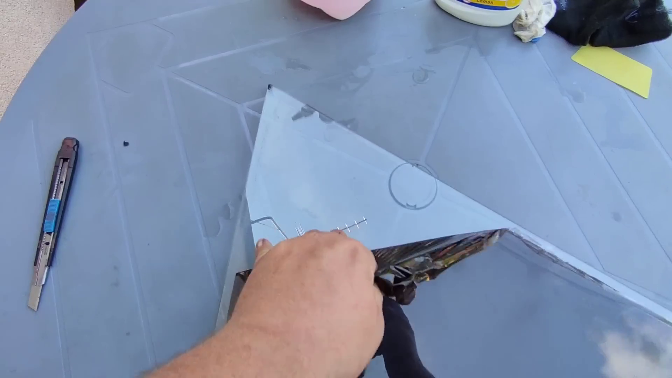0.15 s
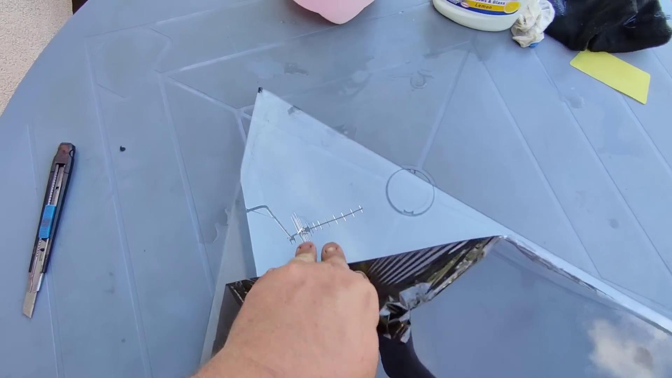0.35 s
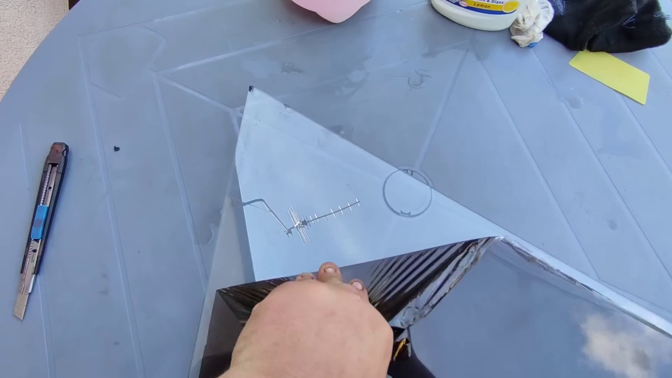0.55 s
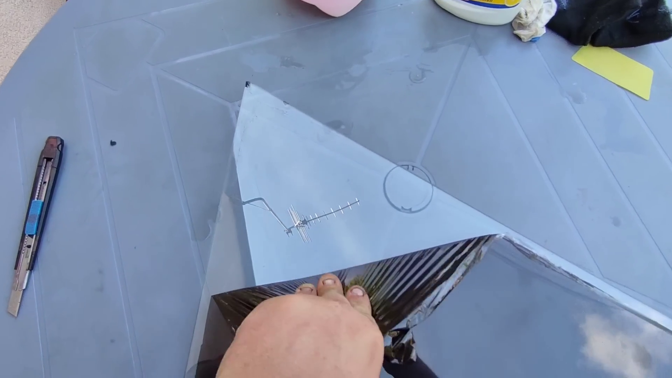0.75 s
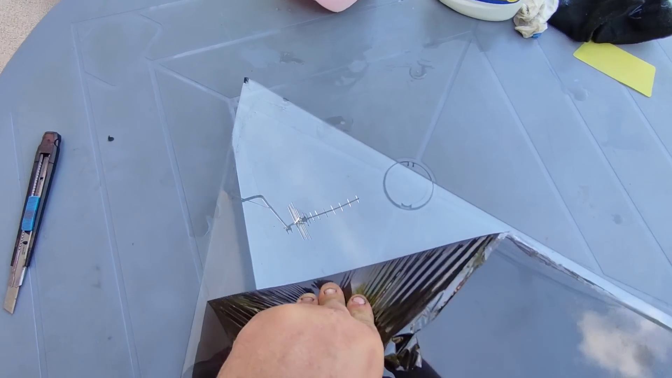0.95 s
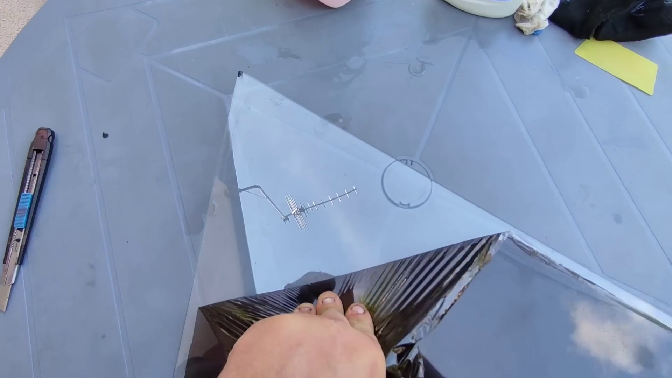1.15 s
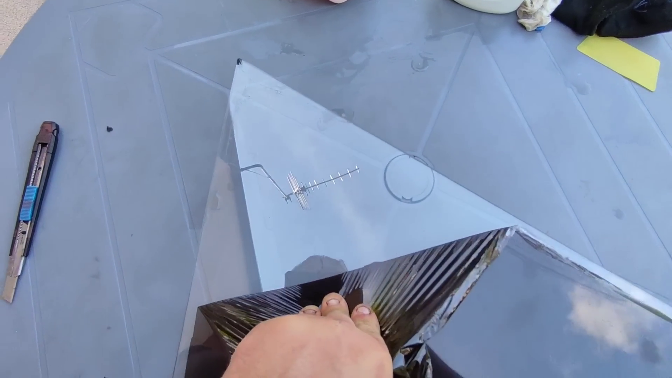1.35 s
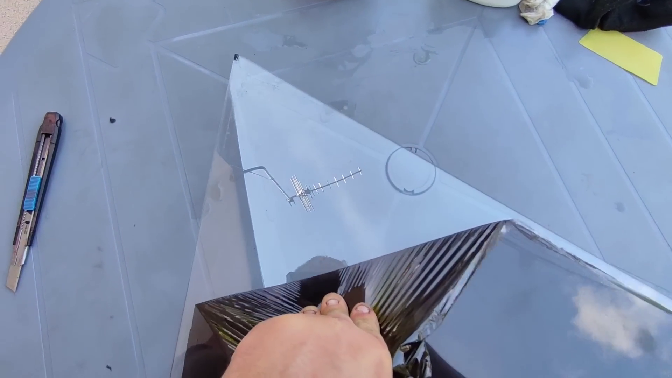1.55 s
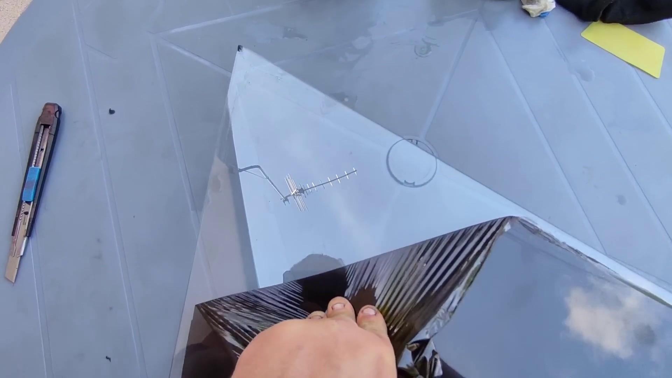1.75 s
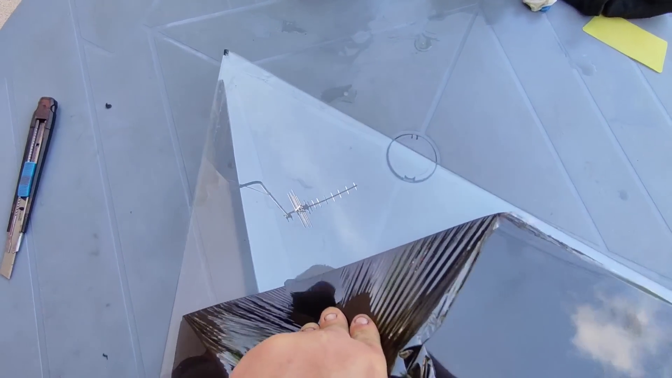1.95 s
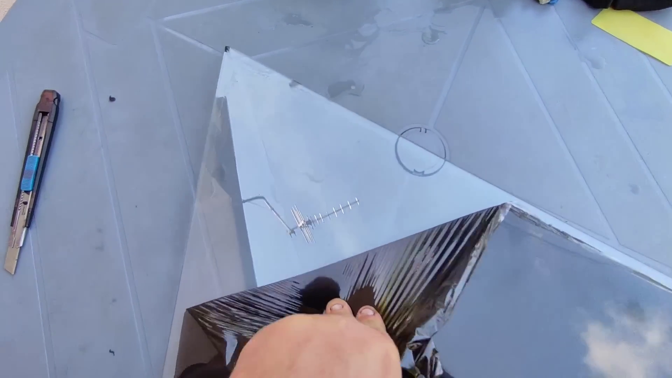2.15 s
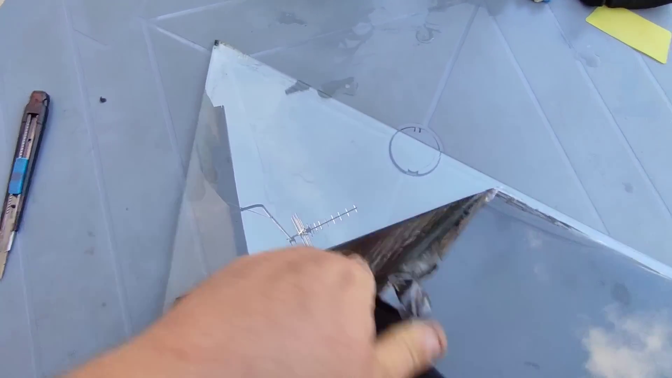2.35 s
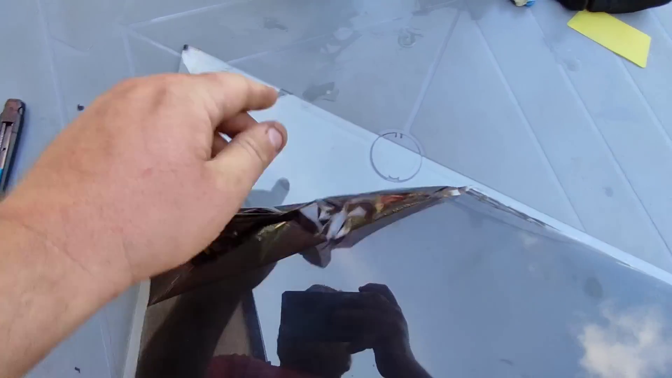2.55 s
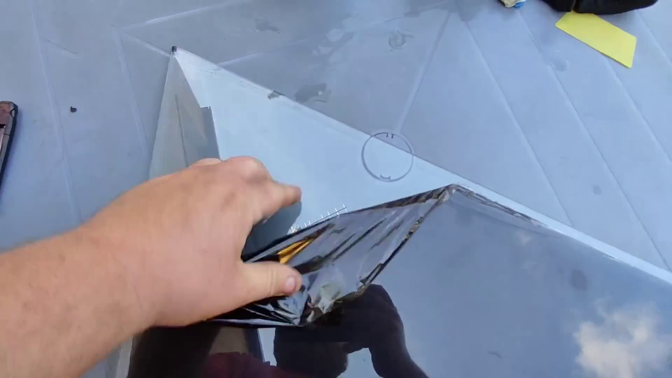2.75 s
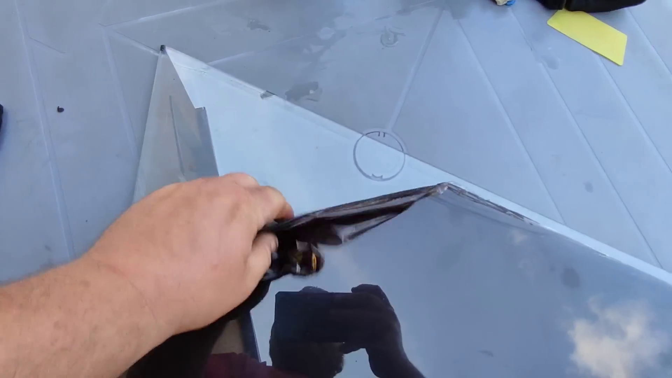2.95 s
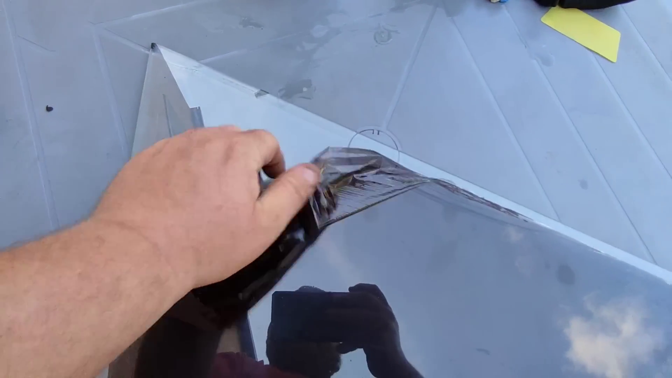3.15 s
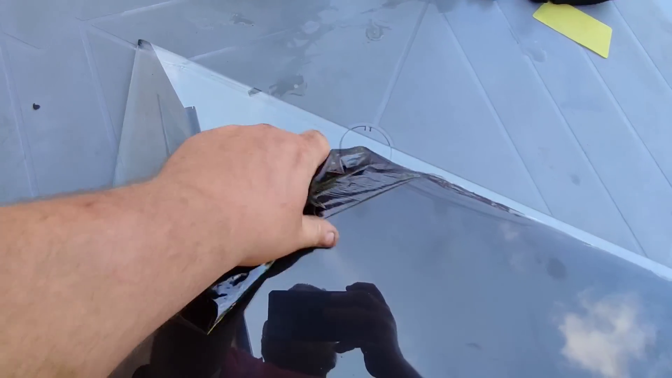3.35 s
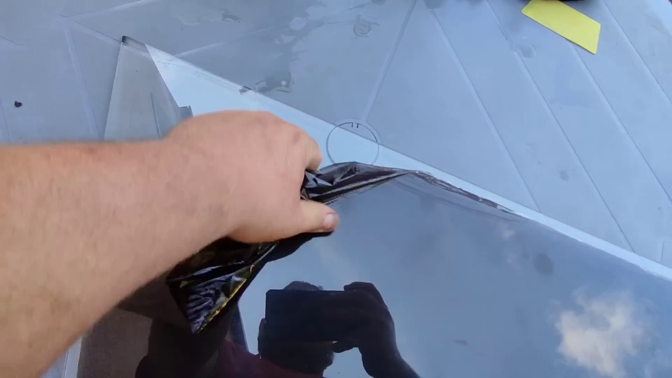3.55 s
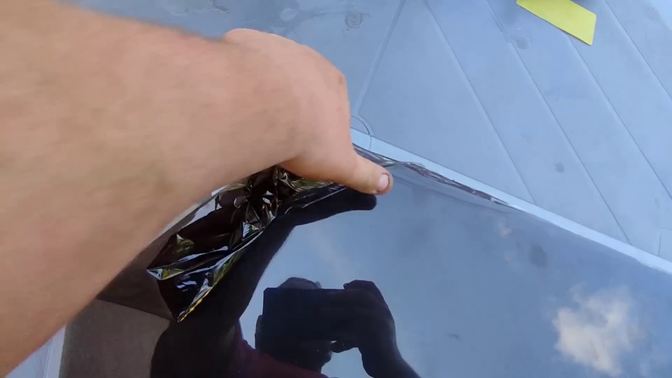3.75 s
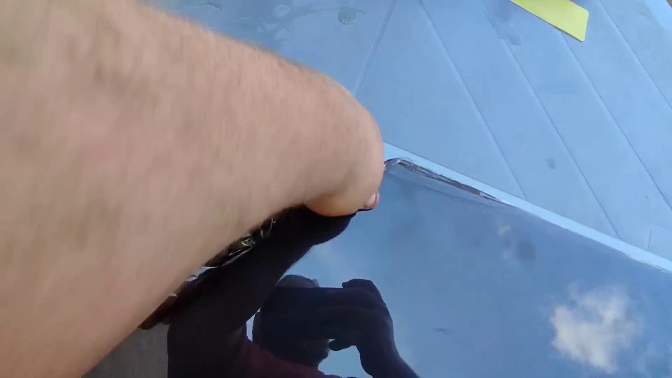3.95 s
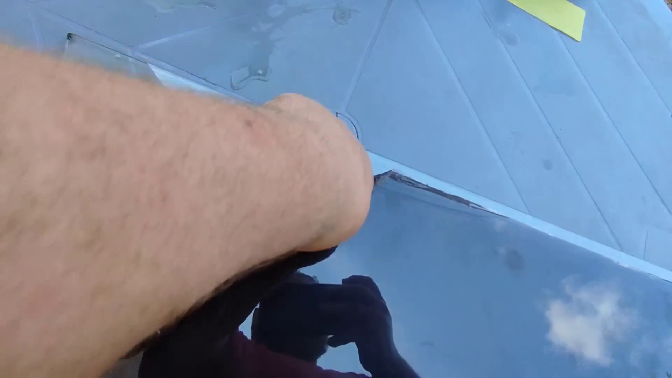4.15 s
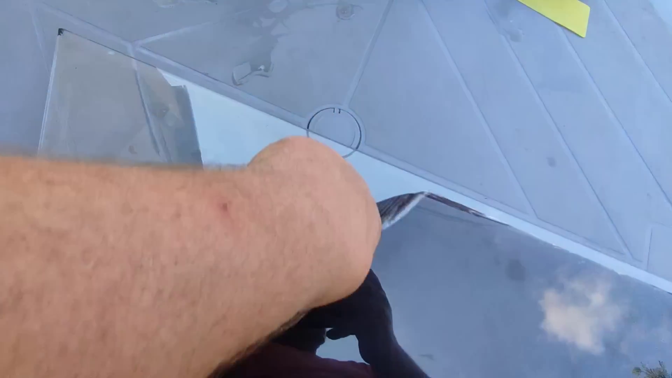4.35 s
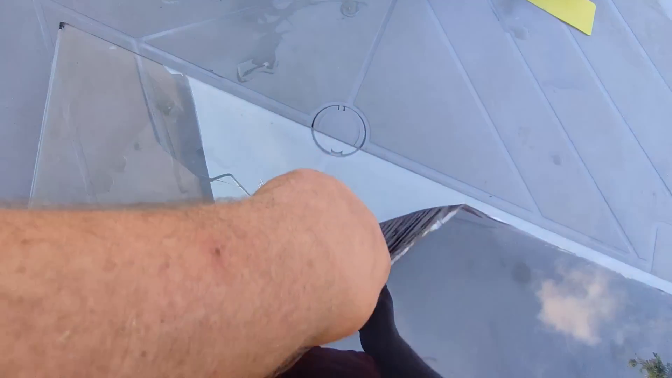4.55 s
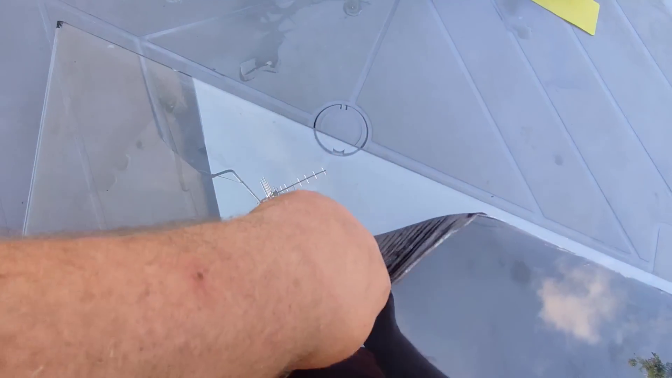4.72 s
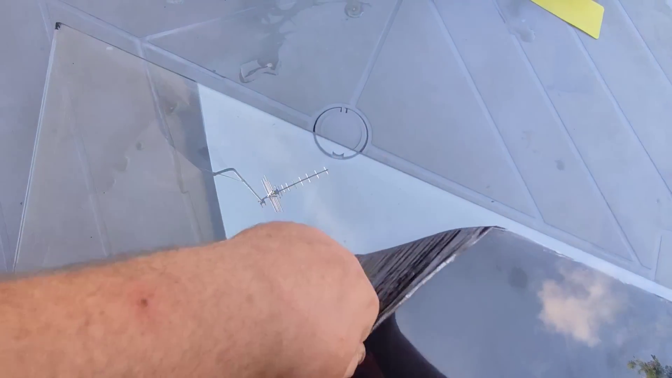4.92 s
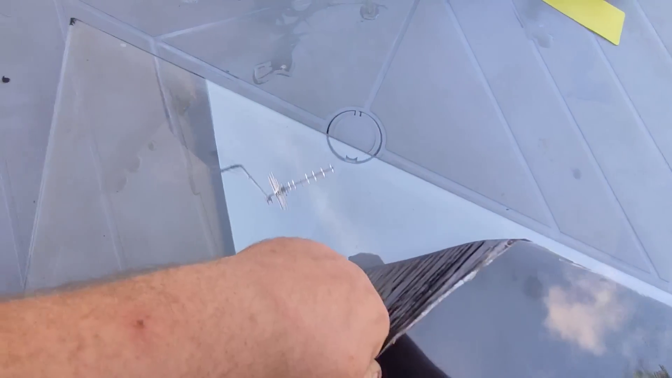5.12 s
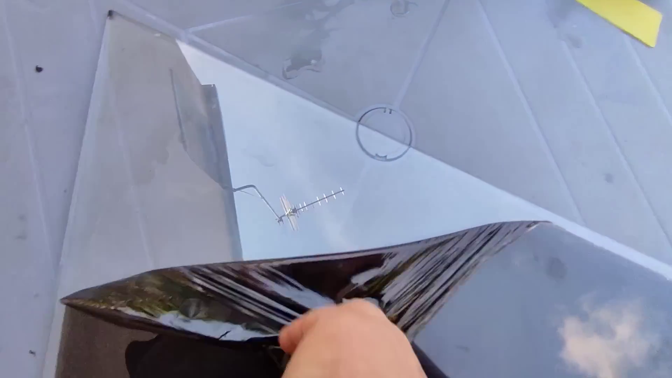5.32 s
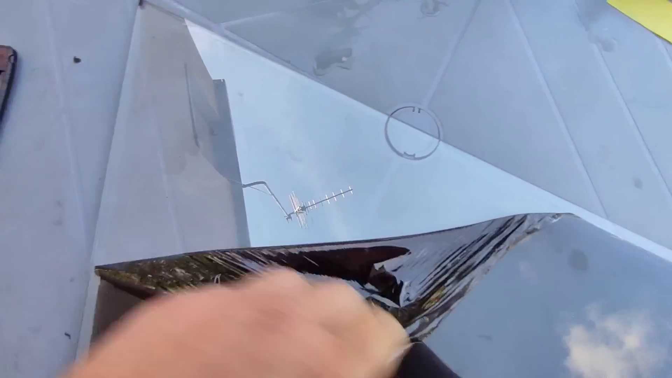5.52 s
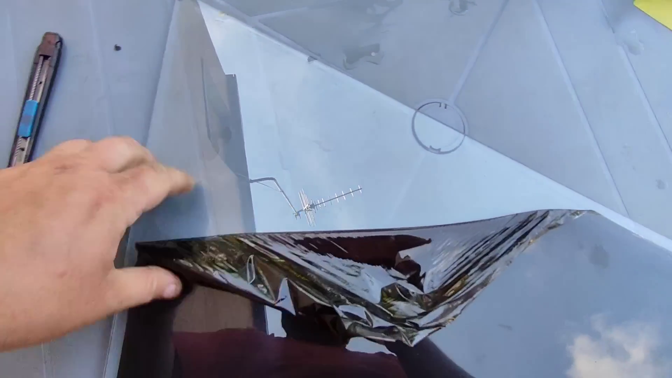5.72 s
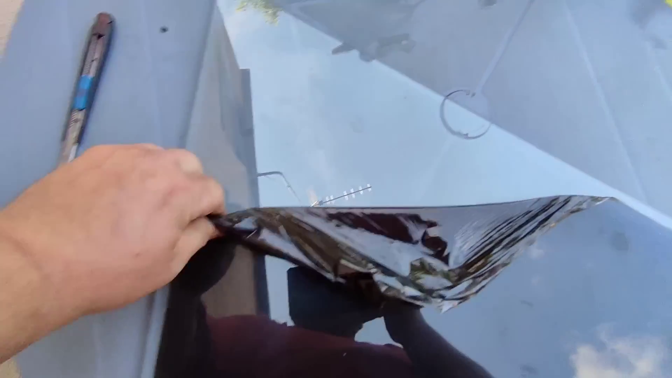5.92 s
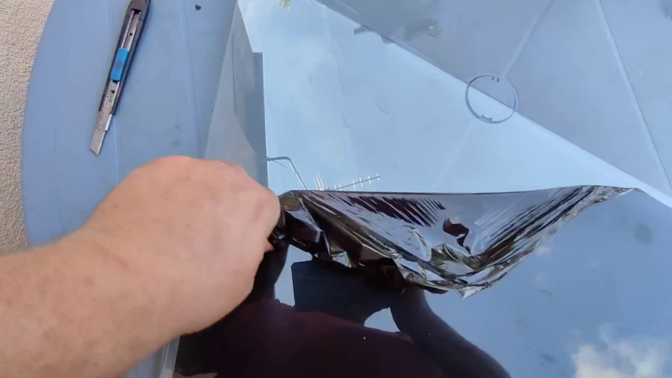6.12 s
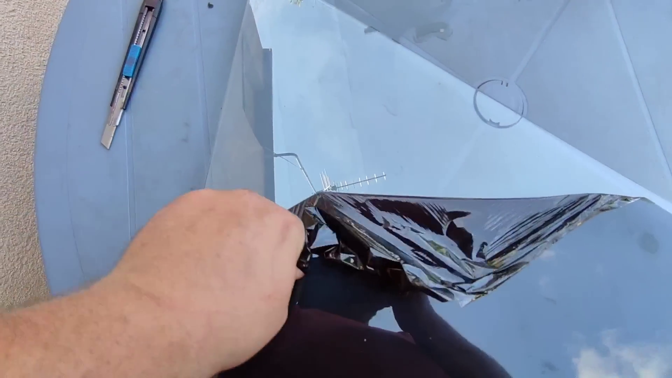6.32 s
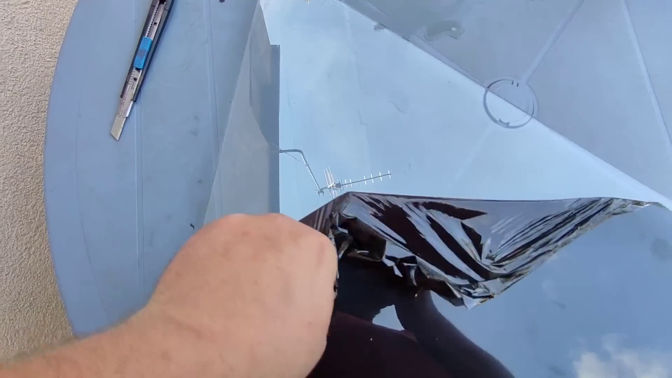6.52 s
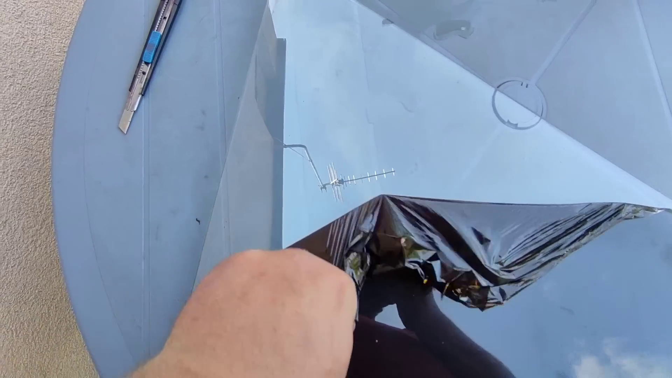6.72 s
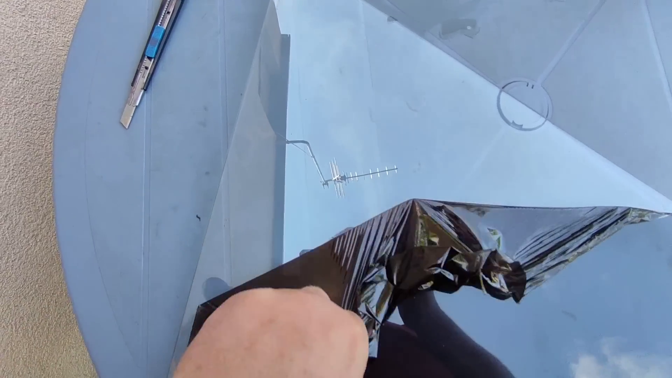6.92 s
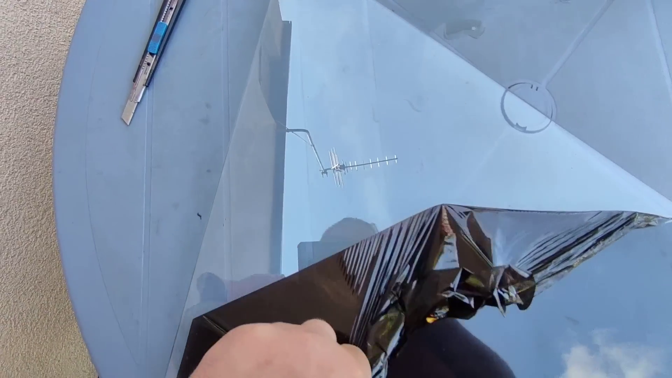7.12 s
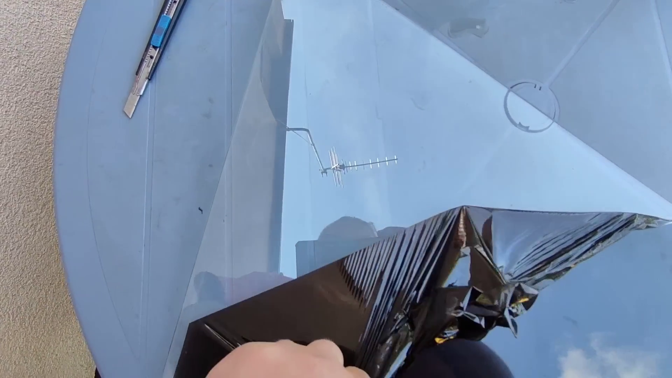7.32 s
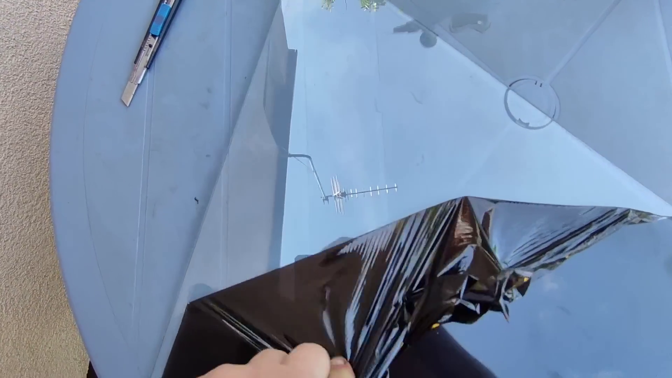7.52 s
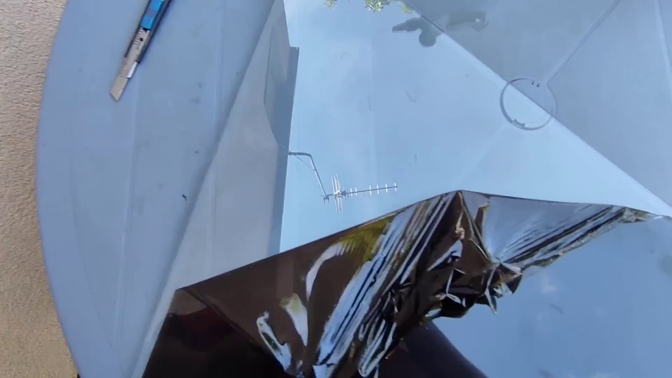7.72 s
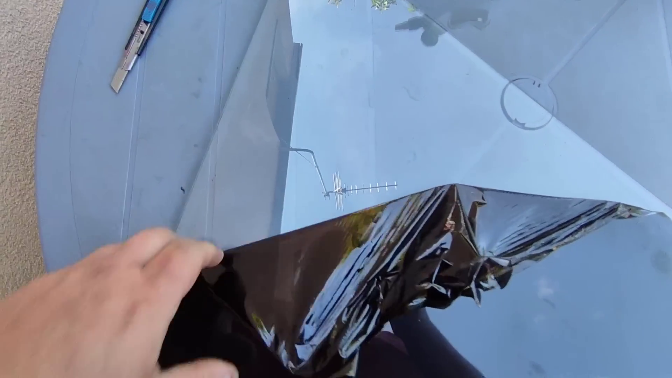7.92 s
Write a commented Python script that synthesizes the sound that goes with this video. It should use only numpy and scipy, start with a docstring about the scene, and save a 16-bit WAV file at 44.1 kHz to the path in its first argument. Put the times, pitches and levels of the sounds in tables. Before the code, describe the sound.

Outdoors, very close to a stereo microphone, a hand peels thin plastic film from a glass pane on a garden table. Sharp snaps open over grainy rustle, then a sparse quiet crackle, then stronger pulls with dull knocks and puffs of air. Crinkling grows nearly continuous toward the end, with a last heavy knock before it thins out. Soft hum and hiss remain underneath.

```python
"""Short sharp snaps over a dense, grainy rustle, with dull knocks and puffs of air, above a quiet outdoor hum.
A hand peels thin plastic film off a glass pane on a garden table, close below a two-port camera microphone.
Snaps are clicks with ragged noise tails and the rustle is random creases over hiss; both ring the facets
of the sheet. Knocks ring modes of the table top, shoves are pressure swings, hum and hiss are shaped noise."""
import sys
import numpy as np
from scipy import signal
from scipy.fft import rfft, irfft, next_fast_len
from scipy.io import wavfile
from scipy.ndimage import uniform_filter1d, map_coordinates

SR = 44100
rng = np.random.default_rng(int(sys.argv[2]) if len(sys.argv) > 2 else 0)


def generate_wav(signal):
    """Clip the signal to [-1, 1] and save it as 16-bit WAV at the path in sys.argv[1]."""
    frames = np.transpose(np.atleast_2d(signal))
    scaled = np.clip(frames, -1, 1) * 32767
    pcm = np.round(scaled).astype(np.int16)
    wavfile.write(sys.argv[1], SR, pcm)


N = 355887

BODY_HZ, SIZZLE_HZ = 1500, 8500  # limits between body, crackle and sizzle
BANDS_HZ = 200 * 2 ** np.arange(0, 6.3, .4)  # pitches of the sheet's facets


def undb(db):
    """Turn decibels into an amplitude factor."""
    return 10 ** (np.asarray(db) / 20)


def level(x, db):
    """Scale a signal to an RMS level in dB."""
    return x * undb(db) / np.sqrt(np.mean(x ** 2))


def colour(x, points):
    """Shape a spectrum along (pitch_hz, gain_db) points, straight over log frequency."""
    hz, db = np.transpose(points)
    size = next_fast_len(N)
    f = np.maximum(np.arange(size // 2 + 1) * SR / size, 1)
    gain = undb(np.interp(np.log(f), np.log(hz), db))
    return irfft(rfft(x, size) * gain, size)[..., :N]


def split(x):
    """Filter into body, crackle and sizzle bands."""
    cuts = ((BODY_HZ, "low"), ([BODY_HZ, SIZZLE_HZ], "band"), (SIZZLE_HZ, "high"))
    return [signal.sosfilt(signal.butter(3, hz, kind, fs=SR, output="sos"), x) for hz, kind in cuts]


def fade(x, t60):
    """Let each impulse die away by 60 dB in t60 seconds."""
    return signal.lfilter([1], [1, -np.exp(-np.log(1000) / (t60 * SR))], x)


def walk(rate):
    """Random levels held 1 / rate seconds and smoothed twice; spread near 1."""
    hold = int(SR / rate)
    steps = np.repeat(rng.standard_normal(N // hold + 1), hold)
    return 1.3 * uniform_filter1d(uniform_filter1d(steps, hold), hold)[:N]


def ports(alike):
    """Noise at the two microphone ports, alike by a share of 0 to 1."""
    mid, side = rng.standard_normal((2, N))
    c = np.clip(alike, 0, 1)
    return (np.sqrt(1 + c) * mid + np.sqrt(1 - c) * side * np.array([[1], [-1]])) / np.sqrt(2)


def curves(table):
    """Interpolate every column after the first over the time of each sample."""
    s, *columns = np.transpose(table)
    return [np.interp(np.arange(N) / SR, s, c) for c in columns]


def region(body, crackle, sizzle):
    """Give one value to each facet, by its pitch."""
    return [body if hz < BODY_HZ else crackle if hz < SIZZLE_HZ else sizzle for hz in BANDS_HZ]


def band(x, hz):
    """Ring one facet of the sheet: a resonance, applied twice."""
    b, a = signal.iirpeak(hz, 3, SR)
    return signal.lfilter(b, a, signal.lfilter(b, a, x))


# Spectrum of the garden around the table: pitch_hz, gain_db (relative)
YARD_SPECTRUM = [(24, -31), (40, 12), (269, -5), (585, -3), (715, -8), (1680, -10), (2570, -13.5),
                 (3470, -17), (6170, -13), (8770, -53), (14500, -51), (16000, -33)]
# Slow swell of the outdoor hiss against the hum: time_s, gain_db
YARD_SWELL = [(0, 11), (1.2, -4), (2.2, -8), (5.1, 6), (5.55, 1), (6.5, 18), (7.8, 9.5), (8.07, 3)]


def yard(level_db=-54.5, wander_db=2.0):
    """Outdoor air: a distant hum, nearly alike at both ports, under a scattered hiss that swells and sinks."""
    alike, scattered = ports(0.62), ports(0.033)
    body, crackle, sizzle = split(colour(np.array([alike, scattered]), YARD_SPECTRUM))
    hum = body[0]
    hiss = (crackle[1] + sizzle[1]) * undb(curves(YARD_SWELL)[0])
    return level(hum + hiss, level_db) * undb(wander_db * walk(3.21))


# Pulls and grips on the sheet: full_strength_s, swell_s (at least 0.005 is used), hold_s,
# level_db (drive of the rustle and rumble)
PULLS = [(0.05, 0.06, .02, -33), (0.4, 0.037, 0.13, -29), (.525, 0.0751, 0.03, -26),
         (0.689, 0.11, 0.011, -44.5), (2.277, 0.12, 0.026, -35), (2.43, 0.061, 0.031, -32.5),
         (2.58, 0.271, 0.0013, -28.5), (2.8, 0.052, 0.15, -35), (3.018, 0.0745, 0.17, -26.5),
         (3.372, 0.04, 0.31, -31), (3.977, .12, 0.00092, -23), (4.075, 0.039, 0.026, -37),
         (4.493, 0.511, 0.0088, -33), (4.697, 0.21, 0.00085, -35.5), (4.866, 0.35, 0.13, -44),
         (5.271, 0.054, 0.054, -27.5), (5.387, 0.0048, 0.039, -23.5), (5.42, 0.027, 0.081, -30),
         (5.512, 0.15, 0.034, -39), (5.858, 0.0315, 0.083, -27), (5.995, 0.14, 0.053, -34),
         (6.153, 0.067, 0.049, -39), (6.407, 0.574, 0.013, -30.5), (6.491, 0.17, 0.12, -36),
         (6.765, 0.3, .001, -24.5), (6.909, 0.31, 0.0011, -29), (7.0, 0.3, 0.088, -33),
         (7.179, 0.073, 0.00083, -42), (7.273, 0.022, 0.0008, -34.5), (7.372, 0.037, 0.00077, -36.5),
         (7.504, 0.051, 0.044, -28), (7.633, 0.026, 0.0066, -25.5), (8, 0.14, 0.00048, -49.5)]


def handling(swell_db=20, fade_db_per_s=262, rest_db=-55):
    """Handling level in dB: each pull swells, holds and dies away over the creak of the sheet at rest."""
    t = np.arange(N) / SR
    power = np.full(N, undb(2 * rest_db))
    for s, swell, hold, db in PULLS:
        before = swell_db * np.maximum(s - t, 0) / max(swell, .005)
        after = fade_db_per_s * np.maximum(t - s - hold, 0)
        power = power + undb(2 * (db - before - after))
    return 10 * np.log10(power)


def rumble(db, follow=0.47, gain_db=-41, jolt_db=2.0):
    """The pull on the pane shakes table and camera: low noise that grows with the handling level."""
    spectrum = [(8, -15), (25, 3.5), (70, -4.5), (160, -8.5), (400, -42)]  # pitch_hz, gain_db
    low = level(colour(ports(0.68), spectrum), gain_db)
    return low * undb(follow * db + jolt_db * walk(18))


# Air shoved at the ports by the flapping sheet: start_s, level_db (before the port balance),
# length_s (time scale of the swing)
SHOVES = [(3.483, -36.5, 0.061), (4.059, -27, 0.044), (5.335, -20, 0.078), (6.766, -30, 0.039),
          (7.644, -35.5, 0.071)]


def shoves(right_db=4, damping=0.73):
    """Air pushed at the ports: a quick drop in pressure and a slow swing back, stronger on the right."""
    out = np.zeros(N)
    for s, db, length in SHOVES:
        u = np.maximum(np.arange(N) / SR - s, 0) / length
        drop = 1 - np.exp(-12 * u)
        swing = np.exp(-damping * u) * np.cos(1.873 * u)
        out -= undb(db) * drop * swing
    return out * undb([[-right_db / 2], [right_db / 2]])


# Hand on the table top: start_s, level_db (strength of the push), contact_s (half the length of the push)
KNOCKS = [(0.215, -28.5, 0.0054), (2.263, -7.5, 0.002), (2.581, -26.5, 0.0058), (2.819, -29.5, 0.007),
          (3.92, -27, 0.0055), (3.992, -21, 0.00075), (4.06, -25.5, 0.0013), (4.275, -31.5, 0.0016),
          (5.207, -30.5, 0.0029), (5.296, -15.5, 0.0044), (5.807, -26.5, 0.0065), (6.091, -32.5, 0.0057),
          (6.765, -33, 0.0064), (7.559, -9, 0.0029), (7.606, -17.5, 0.0031)]
# Modes of the table top: pitch_hz, level_db, t60_s
TABLE_MODES = [(73, -16, 0.19), (179.2, -9, 0.14), (268.3, -11, 0.065), (368, -12.5, 0.026),
               (612, -12.5, 0.071), (800, -15.5, 0.054), (1350, -15, 0.023)]


def knocks(rattle=0.073, rattle_t60=0.058, right_db=1.4):
    """A push with a short rattle rings the table top; soft contact wakes only the low modes."""
    blows = np.zeros(N + 999)
    for s, db, contact in KNOCKS:
        push = np.hanning(int(2 * contact * SR))
        blows[int(s * SR):][:len(push)] += undb(db) * push / push.sum()
    blows = blows[:N]
    rattle_noise = uniform_filter1d(rng.standard_normal(N), size=20)
    blows = blows + rattle * fade(blows, rattle_t60) * rattle_noise
    t = np.arange(SR // 2) / SR
    ring = -sum(undb(db) * np.sin(2 * np.pi * hz * t) * 1000. ** (-t / t60) for hz, db, t60 in TABLE_MODES)
    # the knocks carry nothing below about 65 Hz
    low_cut = signal.butter(2, 65, "high", fs=SR, output="sos")
    sound = signal.sosfilt(low_cut, signal.fftconvolve(blows, ring)[:N])
    return sound * undb([[-right_db / 2], [right_db / 2]])


def creases(rate, spread_db, own_db, t60, rise_t60):
    """Random creases (rate per second) of widely different size and colour: one envelope for each facet."""
    at = np.flatnonzero(rng.random(N) < rate / SR)
    size_db = spread_db * np.minimum(rng.exponential(size=len(at)), 2.5)
    own_colour_db = own_db * rng.standard_normal((len(BANDS_HZ), len(at)))
    hits = np.zeros((len(BANDS_HZ), N))
    hits[:, at] = undb(size_db + own_colour_db)
    return fade(fade(hits, rise_t60), t60)


# Where the hand works on the sheet, also heard in sheet(): time_s, left_minus_right_db,
# low_rustle_db (facets under 1500 Hz), high_rustle_db (facets from 8500 Hz up),
# taut_ring_db (added to the first ring), grain_db (creases against sliding hiss)
PLACE = [(0, -10.5, 3, -2, -2.5, 2), (.3, -14, 4, 3.5, 11, -1), (.45, -2.5, -3.5, -8.5, 18, -7),
         (.62, -7.5, 7.5, -4, 20.5, -5), (1.2, -7.5, -3.5, -5.5, -9, 2), (2.2, -6.5, 5, -1.5, 15.5, -2),
         (2.6, -9.5, 2, -2.5, 11, 3), (3.1, -9, -3.5, -0.5, 11.5, -9), (3.6, -7.5, -1, 0.5, 10, -3.5),
         (4.1, -5.5, 0.5, 0.5, 16.5, -1), (4.7, -9.5, 0, -3, -21, 3), (5.2, -12.5, 6.5, -5, -8, -3),
         (5.36, 5.5, -5, -8, 13, -13), (5.5, -9, -0.5, -6.5, -8, -11.5), (5.9, -5.5, 0.5, -0.5, 8.5, -2.5),
         (6.5, -7, 1, 0, 7, 1), (6.8, -8.5, -0.5, -6, -32, -5.5), (7.3, -12.5, 1, -2, -4, 26),
         (7.62, -3.5, 5.5, -9, 21, -16), (8.07, -9, 7.5, 0, -44, 7)]


def rustle(db, busy_db=-38, busier=0.99, smooth=0.42, body_smooth=0.31, tick_db=-3,
           patchy_db=0.83, drown=0.63, drift_db=2.02, grit_db=2.0):
    """A rasp of small creases and lone dry ticks over the hiss of glue and sliding skin."""
    _, low_db, high_db, _, grain_db = curves(PLACE)
    # a harder pull packs the creases closer
    crowd = undb(busier * np.maximum(db - busy_db, 0))
    rasp = creases(170 * crowd, spread_db=2.5, own_db=5.5, t60=0.02, rise_t60=0.0047)
    rasp = level(rasp / crowd, 0)
    ticks = level(creases(45, spread_db=4.0, own_db=5.0, t60=0.014, rise_t60=0.0015), 0)
    ticks = ticks * undb(tick_db) / crowd ** drown  # a hard pull drowns the lone ticks
    wander_db = np.array([facet_db + drift_db * walk(7.0) for facet_db in region(low_db, 0, high_db)])
    grain = undb(grain_db)
    # the low facets answer mostly to creases
    hiss = np.array(region(body_smooth, smooth, smooth))[:, None]
    texture = (grain * (rasp + ticks) + hiss) / (grain + hiss)
    return texture * undb(db + patchy_db * walk(25) + grit_db * walk(300) + wander_db)


# Creases buckling and glue letting go: start_s, level_db (drive before the facets' own lean),
# body_db (facets under 1500 Hz, relative to level_db), t60_s (at least 0.005, then scaled by facet)
SNAPS = [(0.0283, -6.5, -5, 0.022), (0.0479, -11, 0.5, 0.015), (0.1129, -26.5, -1.5, 0.046),
         (0.14, -21, -5, 0.013), (0.2181, -11, -2.5, 0.031), (0.5296, -5.5, -2.5, 0.021),
         (0.544, -16, -3, 0.014), (0.5821, -14.5, -13, 0.023), (0.604, -19, -21, 0.026),
         (0.6346, -30, -17, 0.017), (0.766, -27.5, -7, 0.02), (0.781, -28.5, -9, 0.015),
         (0.8122, -20, -8.5, 0.014), (0.8713, -29, 2.5, 0.03), (0.906, -32, -19, 0.015),
         (0.9355, -30, -20, 0.012), (0.962, -32.5, -6, 0.019), (1.041, -38, -20, 0.018),
         (1.0567, -33.5, -18, 0.024), (1.0832, -29, -11, 0.0082), (1.1273, -30.5, -4, 0.016),
         (1.3264, -37.5, 4.5, 0.062), (1.377, -22.5, -10, 0.013), (1.587, -29, -0.5, 0.016),
         (1.634, -24, -6, 0.031), (1.866, -26, -3, 0.011), (1.9214, -25, -6.5, 0.088),
         (2.0515, -28.5, -6, 0.017), (2.137, -26, -14.5, 0.027), (2.2628, -16.5, 7.5, 0.053),
         (2.5471, -8.5, -7.5, 0.0096), (2.9028, -20, -16, 0.014), (2.9196, -21.5, -22, 0.057),
         (2.9998, -16.5, -14, 0.015), (3.051, -20.5, -15, 0.023), (3.0922, -29, -21, 0.024),
         (3.271, -23.5, -11, 0.015), (3.353, -16.5, -11, 0.018), (3.4858, -9, -7.5, 0.035),
         (3.494, -9, -8, 0.028), (3.548, -15.5, -10, 0.02), (3.723, -20, -18, 0.029),
         (3.992, -9, -5, 0.038), (4.0615, -2.5, -3, 0.036), (4.154, -7, -3, 0.019),
         (4.245, -21, -12, 0.036), (4.315, -12.5, 1, 0.021), (4.322, -16.5, -9, 0.015),
         (4.419, -33, -28, 0.013), (4.5598, -10.5, -14, 0.025), (4.685, -9, -32, 0.0043),
         (4.7507, -14.5, -8.5, 0.026), (4.8624, -23, -8, 0.024), (4.923, -26, -8, 0.017),
         (4.984, -27.5, -10, 0.012), (5.0303, -26, -7, 0.03), (5.115, -26.5, -4, 0.019),
         (5.264, -17, -13, 0.03), (5.2839, -8, -6.5, 0.011), (5.316, -13, -13, 0.03),
         (5.324, -16, -23, 0.021), (5.3344, -6.5, -5.5, 0.076), (5.346, -11.5, -30, 0.063),
         (5.3863, -12, -13, 0.067), (5.394, -10, -22, 0.018), (5.403, -5.5, -29, 0.018),
         (5.459, -18, -24, 0.012), (5.968, -18.5, -10, 0.047), (6.1408, -16, -10, 0.012),
         (6.221, -20.5, -5, 0.027), (6.266, -26, 2, 0.03), (6.298, -22, -1, 0.03),
         (6.4119, -33, -14, 0.034), (6.4652, -15.5, -6, 0.014), (6.508, -18.5, -13, 0.043),
         (6.535, -22, -21, 0.027), (6.5642, -17, -9, 0.066), (6.577, -26, -6, .02),
         (6.666, -27, -24, 0.035), (6.69, -16.5, -23, 0.089), (6.7118, -14, -1, 0.014),
         (6.7701, -6, -5, 0.018), (6.855, -17, -21, 0.021), (6.893, -25, -2, 0.034),
         (6.913, -11, -20, 0.0082), (6.934, -24, -2, 0.028), (7.009, -23, 0.5, 0.029),
         (7.0568, -19.5, -29, 0.0087), (7.1281, -19, 3, 0.023), (7.1709, -23.5, -3, 0.021),
         (7.252, -16, -7, 0.0098), (7.2895, -26, -3, 0.03), (7.336, -16, -5.5, 0.014),
         (7.3727, -17, -2, 0.038), (7.394, -21, -14, 0.013), (7.4431, -22, -1.5, 0.0098),
         (7.4953, -28, -11, 0.068), (7.5375, -10.5, 5, 0.027), (7.56, -19, 8, 0.045),
         (7.6131, -11, -0.5, 0.043), (7.623, -18, -12, 0.012), (7.6372, -6.5, -28, 0.016),
         (7.6855, -14, -36, 0.026), (7.934, -22.5, -16, 0.0093), (8.0136, -24, -14, 0.036)]


def snaps(click=5.3, body_click=10.2, crack=0.63, crack_s=0.0011, rise_s=0.00076, own_db=4.0,
          crackle_db=-4, sizzle_db=-6, ragged_db=3.0, bursts_per_s=1300):
    """A click and a quick crack, then a ragged tail; every snap favours facets of its own."""
    strokes, clicks = np.zeros((2, len(BANDS_HZ), N))
    t = np.arange(SR // 8) / SR
    t60_scale = np.array(region(1.28, 0.92, 0.84))[:, None]
    leans = rng.standard_normal((len(SNAPS), len(BANDS_HZ)))
    for (s, db, low_db, t60), lean in zip(SNAPS, leans):
        i = int(s * SR)
        u = t[:N - i]
        facets = undb(db + np.array(region(low_db, crackle_db, sizzle_db)) + own_db * lean)[:, None]
        tail = 1000. ** (-u / (max(t60, .005) * t60_scale))
        shape = tail + crack * np.exp(-u / crack_s)
        clicks[:, i] = region(body_click, click, click) * facets[:, 0]
        strokes[:, i:i + len(u)] += facets * shape * (1 - np.exp(-u / rise_s))
    # the glue gives way in fits, so each tail is a string of spikes
    spikes = level(undb(ragged_db * walk(bursts_per_s)), 0)
    return strokes * spikes, clicks


# Resonances of sheet and ports, the taut ring first: pitch_hz, width_hz, added_db (before flexing)
RINGS = [(2650, 430, -4.5), (561, 185, -10), (2477, 1760, 4), (8260, 1700, -5.5)]
# The sheet as heard through the ports: pitch_hz, gain_db (relative)
FILM_SPECTRUM = [(150, -16.5), (383, -12), (689, -9), (790, -7.5), (1020, -12), (1240, -8), (1630, -14),
                 (2400, -10), (3490, -10), (7180, -1), (8730, -10.5), (14800, -6.5), (16000, -1.5)]


def sheet(strokes, clicks, gain_db=4, alike_hz=1300, least_alike=0.35, lag_s=0.00011, flex_db=1.5):
    """Noisy strokes and clicks shake the crumpled facets; long waves reach both ports alike, short scatter."""
    balance_db, _, _, taut_db, _ = curves(PLACE)
    sides_db = np.array([[1], [-1]]) * balance_db / 2
    out = 0
    # long waves are also nearly equally loud at both ports
    for hz, stroke, click, shade in zip(BANDS_HZ, strokes, clicks, region(0, 0.88, 0.5)):
        alike = max(1 / (1 + (hz / alike_hz) ** 2), least_alike)
        drive = click + stroke * ports(alike)
        out = out + band(undb(shade * sides_db) * drive, hz)
    # the rings come and go as the sheet flexes
    rings = []
    for hz, width, db in RINGS:
        ring = signal.lfilter(*signal.iirpeak(hz, hz / width, SR), out)
        rings.append(undb(db + flex_db * walk(6.5)) * ring)
    left, right = out + rings[0] * undb(taut_db) + sum(rings[1:])
    # the work wanders over the sheet, so one port hears it a little before the other
    right = map_coordinates(right, [np.arange(N) + lag_s * SR * walk(4)], mode="mirror")
    return colour(np.array([left, right]), FILM_SPECTRUM) * undb(gain_db)


def scene():
    """Film over glass close to the ports, the table below it and the garden around."""
    background = yard()
    db = handling()
    strokes, clicks = snaps()
    film = sheet(strokes + rustle(db), clicks)
    return background + rumble(db) + shoves() + knocks() + film


def record(dry):
    """The input rounds the highest peaks and the recorder cuts the top above 15.8 kHz."""
    rounded = .97 * np.tanh(dry / .97)
    return signal.sosfilt(signal.ellip(10, .2, 95, 15800, fs=SR, output="sos"), rounded)


dry = scene()
out = record(dry)
generate_wav(out)
```